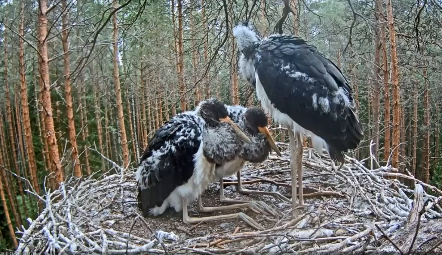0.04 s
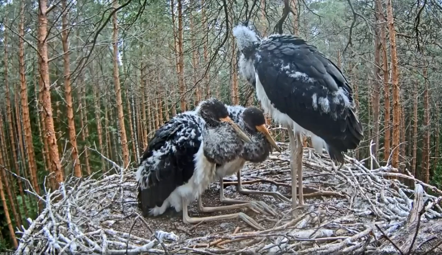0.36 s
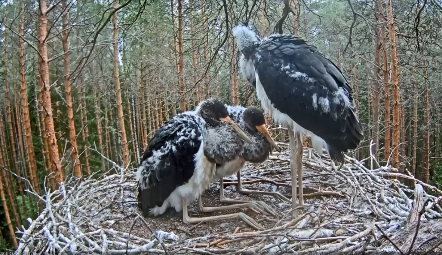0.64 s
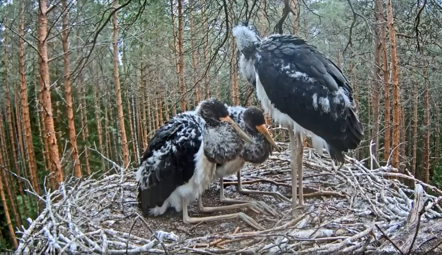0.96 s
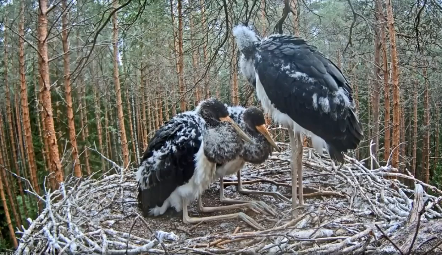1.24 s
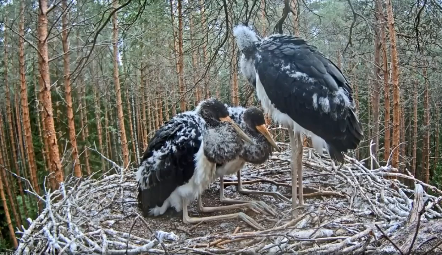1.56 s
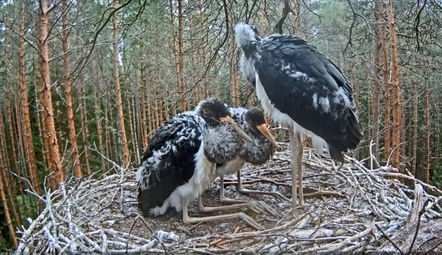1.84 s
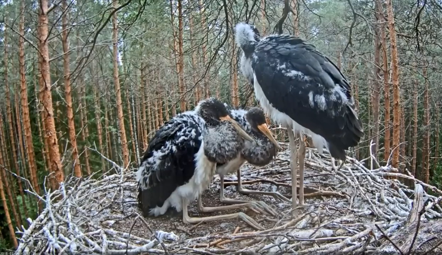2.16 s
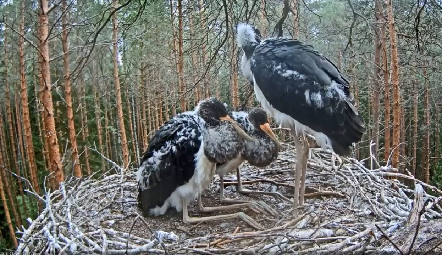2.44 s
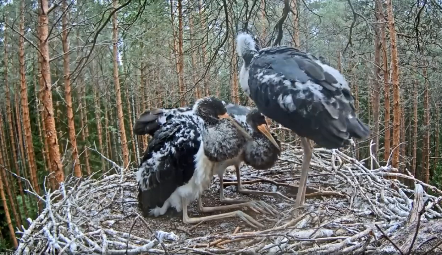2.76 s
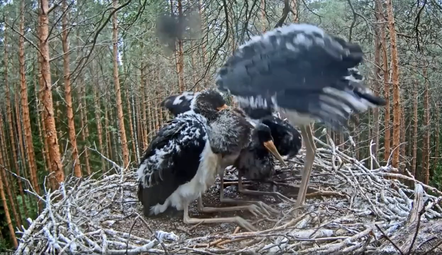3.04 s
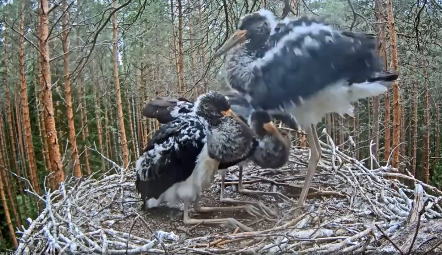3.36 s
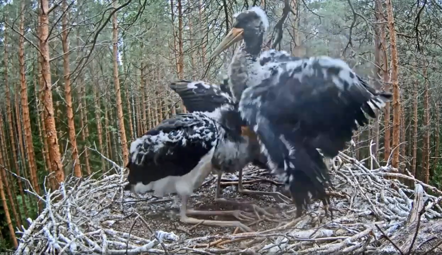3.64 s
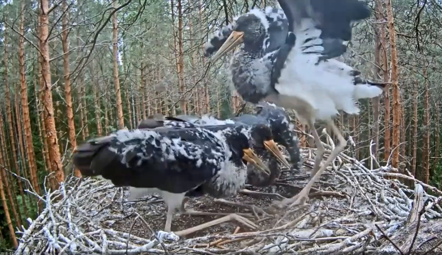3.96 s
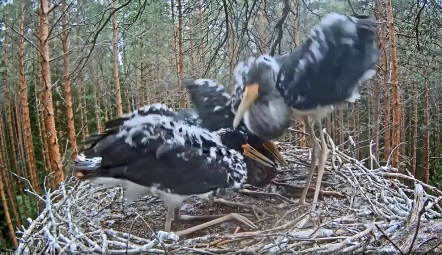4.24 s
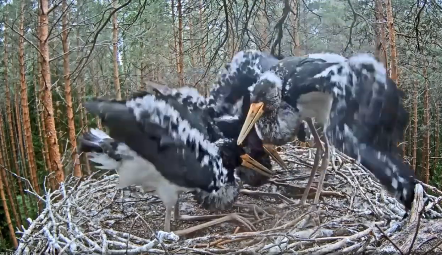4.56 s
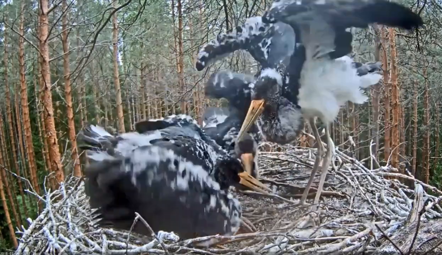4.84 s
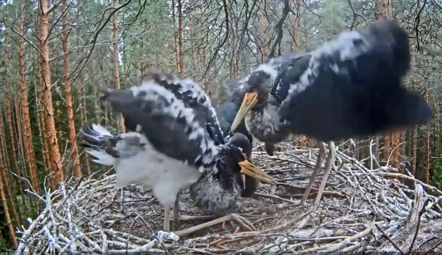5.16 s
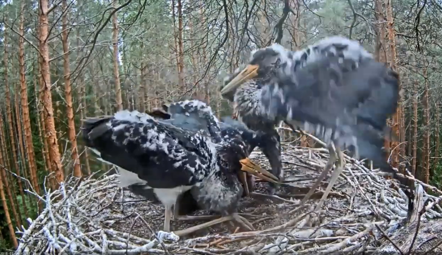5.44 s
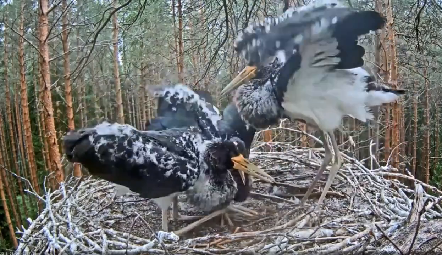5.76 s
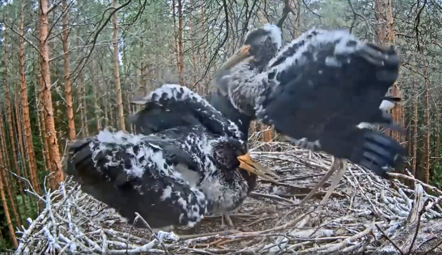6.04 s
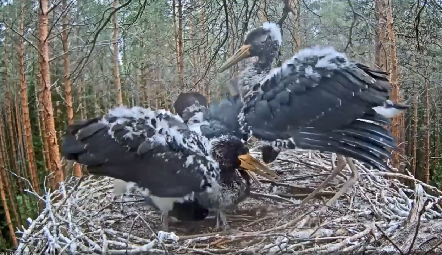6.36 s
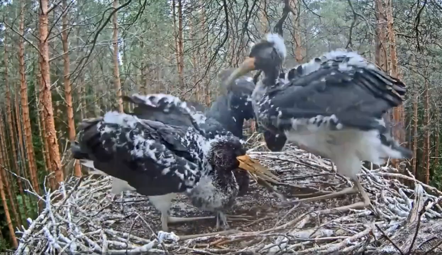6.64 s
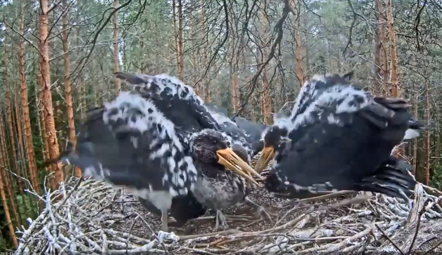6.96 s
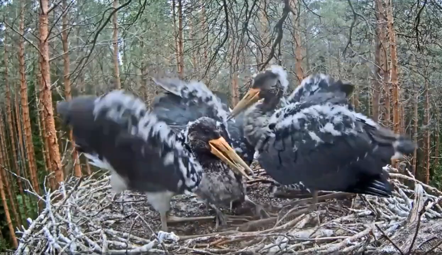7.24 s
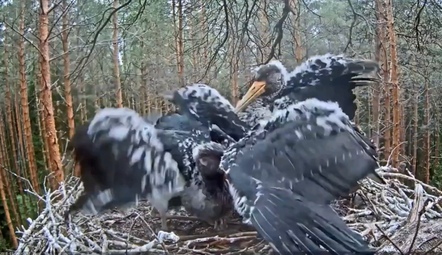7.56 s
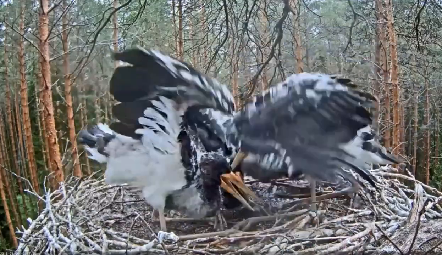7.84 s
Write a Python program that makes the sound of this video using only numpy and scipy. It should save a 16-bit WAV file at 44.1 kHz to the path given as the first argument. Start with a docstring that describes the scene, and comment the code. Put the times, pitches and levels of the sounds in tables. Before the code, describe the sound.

For the first two and a half seconds there is only a soft, steady forest hush, with a few faint, thin peeps from small birds near the start and around two seconds. Feathers then begin to brush. From about three seconds, stork chicks close to the microphone beg in a fast see-saw of short low croaks and harsh, swooping, whistled squeaks, roughly nine a second. Underneath, their wings rustle over crackling dry twigs, with scattered sharp knocks on the nest and five brief low puffs of air on the microphone between about 3.7 and 7.4 seconds. The begging gets louder near five seconds, when two chicks squeak at once. From about 5.6 seconds thin, wavering squeals arch between the calls. After a very short lull around 6.5 seconds, the calls return at full strength, and the feather rustle swells toward the end at eight seconds.

```python
"""Black stork nestlings beg on a stick nest in a pine forest, close to a small fixed microphone. Small birds
peep over the forest hush, then feathers start to brush. From about three seconds on the chicks call with low
croaks (pulses ringing the throat) and harsh, swooping, whistled squeaks, about nine a second; at first a croak
leads into each squeak, later it breaks out in the squeak's middle, while their wings fan the air and knock the
twigs. At the height of the begging two squeak at once, and thin squeals arch between the calls to the end."""
import sys
import numpy as np
from scipy import signal
from scipy.fft import rfft, irfft
from scipy.io import wavfile
from scipy.ndimage import map_coordinates

SR = 44100
rng = np.random.default_rng(int(sys.argv[2]) if len(sys.argv) > 2 else 0)


def store_wav(level_fs):
    """Save 16-bit WAV to argv[1]."""
    pcm = np.round(np.clip(np.atleast_2d(level_fs), -1, 1) * 32767)
    wavfile.write(sys.argv[1], SR, pcm.T.astype(np.int16))


N = 352800
TIME = np.arange(N) / SR


def undb(db):
    """Decibels to gain."""
    return 10 ** (np.asarray(db) / 20)


def unit(x):
    """Scale to rms 1."""
    return x / np.sqrt(np.mean(x ** 2))


def add(out, start_s, x):
    """Mix x in from a start time."""
    i = int(start_s * SR)
    out[i:i + len(x)] += x[:N - i]


def at(curve, time_s):
    """Read an automation curve's columns at a given time."""
    times, *columns = np.transpose(curve)
    return [np.interp(time_s, times, column) for column in columns]


def colour(x, eq):
    """Shape x with an EQ curve of (freq_hz, gain_db) points; rms 1."""
    hz, db = np.transpose(eq)
    bins = np.arange(len(x) // 2 + 1) * SR / len(x)
    gain = undb(np.interp(np.log(bins + 1), np.log(hz), db))
    return unit(irfft(rfft(x) * gain, len(x)))


def wander(hz):
    """Smooth random modulation up to a given rate; rms 1."""
    return unit(signal.sosfilt(signal.butter(2, hz, fs=SR, output="sos"), rng.standard_normal(N)))


def scatter(x, db, decay_s):
    """Add a dense cloud of echoes that dies away."""
    echoes = rng.standard_normal(SR) * np.exp(-TIME[:SR] / decay_s)
    return x + undb(db) * signal.fftconvolve(x, echoes / np.linalg.norm(echoes))[:N]


# EQ of the forest bed: freq_hz, gain_db
FOREST_EQ = [(15, -12), (25, 1), (91, -4), (250, -11), (620, -13.5), (1700, -22), (4200, -34.5),
             (7420, -39), (14000, -42)]


def forest(level_db=-48):
    """Steady hush of air in the pines."""
    return colour(rng.standard_normal(N), FOREST_EQ) * undb(level_db)


# small bird cues: start_s, length_s, pitch_hz, fall_octaves, level_db
BIRD_PEEPS = [(0.093, 0.026, 8900, 0.29, -52.5), (0.122, 0.013, 8600, 0.38, -57), (.17, .07, 7700, .1, -67),
              (.565, .075, 7600, 0.1, -66), (1.908, 0.015, 9200, 0.21, -57.5),
              (1.93, 0.016, 9000, 0.38, -60)]


def small_birds():
    """Thin falling peeps; the steep ones buzz."""
    out = np.zeros(N)
    for start, length, hz, fall, db in BIRD_PEEPS:
        age = np.linspace(0, 1, int(length * SR))
        buzz = fall / 5 * wander(700)[:len(age)]
        pitch = hz * 2 ** (buzz - fall * np.sin(np.pi * age / 2))
        phase = 2 * np.pi * np.cumsum(pitch) / SR
        add(out, start, undb(db) * np.sin(np.pi * age) * np.sin(phase))
    return out


# wing strokes that blow on the microphone: peak_s, level_db
WING_GUSTS = [(3.682, -39), (4.08, -36), (4.98, -33), (6.04, -38), (7.359, -32.5)]


def gusts(width_s=0.017):
    """Air pushed by a wing rumbles on the microphone."""
    swells = sum(undb(db) * np.exp(-((TIME - peak) / width_s) ** 2) for peak, db in WING_GUSTS)
    return wander(72) * swells


# fader ride of the brushing feathers: time_s, level_db
FEATHER_LEVEL = [(2.5, -66), (2.75, -59.5), (3.7, -45.5), (5.7, -49.5), (6.6, -57), (7.85, -36.5),
                 (8, -45.5)]
# wings and feet striking twigs: start_s, level_db, decay_s
TWIG_KNOCKS = [(3.036, -39.5, 0.038), (3.162, -41.5, 0.0057), (3.751, -27.5, 0.0074), (4.713, -28, 0.017),
               (5.586, -25, 0.01), (7.129, -26, 0.0031)]
# EQ of feathers, twigs and hissing breath: freq_hz, gain_db
HISS_EQ = [(2000, 14.5), (5000, 10.5), (9000, 9), (13000, -11.5)]


def wings(grain_db=1.0, crackle_db=-4, snaps_per_s=90):
    """Feathers scrape in fine grains over crackling dry twigs; each knock is a burst that dies away."""
    force = undb(np.interp(TIME, *np.transpose(FEATHER_LEVEL), left=-np.inf) + 2 * wander(30))
    snaps = (rng.random(N) < snaps_per_s / SR) * rng.uniform(-1, 1, N)
    crackle = undb(crackle_db) * force * colour(scatter(snaps, db=6, decay_s=.0012), HISS_EQ)
    for start, db, decay in TWIG_KNOCKS:
        add(force, start, undb(db) * np.exp(-TIME[:SR] / decay))
    grains = rng.standard_normal(N) * undb(grain_db * wander(1300))
    return crackle + force * colour(grains, HISS_EQ)


# throat resonances: centre_hz, width_hz, gain_db
FORMANTS = [(240, 89, 9), (626, 286, 3), (1204, 65, 2.5), (1890, 114, 7), (2487, 146, 3), (3430, 130, 1.5)]


def throat(x, low_db, upper_db, shift=1):
    """The chick's throat: two low resonances and the brighter ones of the open bill."""
    out = np.zeros(len(x))
    for k, (hz, width, db) in enumerate(FORMANTS):
        centre = hz * shift
        ring = signal.lfilter(*signal.iirpeak(centre, centre / width, fs=SR), x)
        out += (-1) ** k * undb(db + (low_db if k < 2 else upper_db)) * ring
    return out


# how both calls change with excitement: time_s, croak_pitch_hz, croak_fall_log_ratio,
# croak_bright_db, croak_honk_db, squeak_swoop_octaves, squeak_swoop_db
VOICE_CURVES = [(3.278, 206.3, 0.11, -6, -13, 0.46, -18.5), (3.72, 288.9, .18, -3.5, 7, 0.63, -11.5),
                (4.4, 303.6, 0.39, -0.5, -6, 0.39, -21.5), (5.8, 356.6, 0.47, 2.5, -33, .5, -24),
                (6.4, 343.5, 0.52, 2, -29, 0.29, -21), (6.75, 346, 0.46, 3.5, -14, 0.065, -28.5),
                (7.9, 359.5, 0.46, -1, -25, 0.27, -23.5)]
# how hard the chicks croak: time_s, level_db
CROAK_EFFORT = [(3.2, -39), (3.28, -31.5), (3.8, -28.5), (4.65, -30.5), (5.2, -29), (7.9, -31.5)]
# croaks, at first just ahead of each squeak, from about 5.4 s breaking out in its middle: start_s, length_s
CROAK_CUES = [ (3.2, 0.0054), (3.279, .046), (3.374, 0.055), (3.487, 0.039), (3.598, 0.05), (3.721, .031),
              (3.836, 0.033), (3.943, 0.038), (4.052, 0.045), (4.173, 0.034), (4.27, 0.043), (4.447, 0.016),
              (4.556, 0.032), (4.654, 0.062), (4.715, 0.039), (4.789, 0.035), (4.926, 0.037),
              (5.034, 0.037), (5.133, 0.041), (5.24, .03), (5.344, 0.029), (5.407, 0.029), (5.447, 0.027),
              (5.511, 0.032), (5.554, 0.027), (5.645, .022), (5.755, 0.022), (5.831, 0.028), (5.936, .018),
              (6.031, 0.028), (6.099, 0.022), (6.143, 0.023), (6.202, .022), (6.242, 0.027), (6.306, 0.027),
              (6.353, .056), (6.433, 0.026), (6.495, 0.047), (6.64, 0.0079), (6.741, 0.013), (6.828, 0.024),
              (6.891, 0.009), (6.937, 0.023), (7.044, 0.047), (7.052, 0.035), (7.173, 0.02), (7.262, 0.013),
              (7.342, 0.014), (7.377, 0.015), (7.574, 0.014), (7.705, 0.026), (7.789, 0.039),
              (7.906, 0.041)]


def croaks(breath=0.14, fundamental_db=-6, throat_spread=.055, release_s=.006):
    """Falling trains of uneven, breathy pulses ring the throat over a round tone and its honking octave."""
    out, jitter = np.zeros(N), .12 * wander(250)
    hiss, strength = rng.standard_normal(N), undb(3 * wander(250))
    variations = rng.standard_normal((len(CROAK_CUES), 3))
    for (start, length), (detune, sag, gape) in zip(CROAK_CUES, variations):
        start_hz, fall, bright_db, honk_db = at(VOICE_CURVES, start)[:4]
        now = np.flatnonzero((TIME >= start) & (TIME < start + length + release_s))
        age = (TIME[now] - start) / length
        progress = age / age[-1]
        settled = np.sin(np.pi * progress / 2)  # ragged at first, steadier at the end
        glide = -fall * (1 + .3 * sag) * age
        pitch = start_hz * np.exp(glide + (1.2 - settled) * jitter[now] + .03 * detune)
        cycles = np.cumsum(pitch) / SR
        pulses = np.diff(np.floor(cycles), prepend=-1) * strength[now]
        puffs = breath * hiss[now] * np.exp(-2 * (cycles % 1))
        tone = undb(fundamental_db) * np.cos(2 * np.pi * cycles)
        honk = undb(honk_db) * np.cos(4 * np.pi * cycles)
        rattle = unit(throat(pulses + puffs, 0, bright_db, shift=1 + throat_spread * gape))
        voice = rattle + settled * (tone - honk)
        envelope = np.sin(np.pi * np.sqrt(progress)).clip(0) ** .5  # quick attack, softer release
        out[now] += undb(at(CROAK_EFFORT, start)[0]) * unit(voice * envelope)
    return out


# squeals that arch from one squeak to the next: start_s, length_s, top_pitch_hz, level_db
SQUEAL_CUES = [(5.605, .056, 4250, -32), (5.769, 0.041, 5220, -34), (5.838, 0.065, 4240, -34),
               (5.938, 0.06, 4350, -32.5), (6.655, 0.06, 3930, -36.5), (6.75, 0.055, 5100, -36.5),
               (6.853, 0.066, 5850, -32.5), (6.983, 0.042, 4620, -32.5), (7.137, 0.039, 4920, -31.5),
               (7.218, 0.033, 4930, -31.5), (7.385, 0.07, 6030, -33.5), (7.489, 0.082, 5700, -36.5),
               (7.61, 0.068, 6420, -32), (7.714, 0.056, 5920, -30), (7.928, 0.043, 4400, -34)]


def squeals(foot_hz=2300, bill_hz=4200, thin_db_per_octave=-26, twin_ratio=1.1, twin_db=-6,
            overtone_db=-18):
    """A wavering whistle and its weaker, higher twin climb from a hoarse foot to a thin top and back."""
    out = np.zeros(N)
    for ratio, voice_db in (1, 0), (twin_ratio, twin_db):
        shake, waver, tremble = .06 * wander(1040), .045 * wander(120), undb(5.2 * wander(300))
        for start, length, top_hz, db in SQUEAL_CUES:
            now = np.flatnonzero((TIME > start) & (TIME < start + length))
            arch = 1 - abs(2 * (TIME[now] - start) / length - 1) ** 1.5
            hoarse = np.interp(start, (7, 7.5), (1, 2))  # the last squeals are hoarser
            wobble = np.exp(waver[now] + hoarse * (1 - arch / 2) * shake[now])
            pitch = ratio * (foot_hz + (top_hz - foot_hz) * arch) * wobble
            thin_db = thin_db_per_octave * np.log2(pitch / bill_hz).clip(0)
            blow = undb(db + voice_db + thin_db) * np.sqrt(2 * np.sqrt(arch)) * tremble[now]
            phase = 2 * np.pi * np.cumsum(pitch) / SR
            out[now] += blow * (np.sin(phase) + undb(overtone_db) * np.sin(2 * phase))
    return out


# begging squeaks: middle_s, level_db
SQUEAK_CUES = [ (3.314, -38), (3.423, -26.5), (3.538, -26.5), (3.66, -31), (3.774, -30.5), (3.894, -27),
               (4.006, -24.5), (4.132, -25.5), (4.239, -24), (4.339, -24.5), (4.444, -26), (4.521, -30),
               (4.565, -28.5), (4.681, -30), (4.827, -20.5), (4.901, -21), (4.99, -20.5), (5.089, -24),
               (5.196, -22), (5.301, -23.5), (5.405, -25), (5.505, -26.5), (5.551, -24), (5.655, -26.5),
               (5.758, -27), (5.821, -27), (5.924, -20), (6.016, -21), (6.081, -21.5), (6.132, -28),
               (6.183, -25), (6.239, -29), (6.28, -24.5), (6.345, -23), (6.393, -25.5), (6.433, -25.5),
               (6.495, -32.5), (6.727, -19.5), (6.826, -20), (6.935, -19.5), (6.982, -18.5), (7.04, -22.5),
               (7.072, -18.5), (7.171, -21.5), (7.279, -20), (7.374, -19.5), (7.476, -21), (7.581, -23),
               (7.687, -22), (7.784, -21), (7.9, -28)]
# squeak envelope as the begging goes on: time_s, lead_in_s, tail_share_of_wait
SQUEAK_SHAPE = [(3.3, 0.012, 0.32), (3.78, 0.024, 0.38), (4.12, 0.019, 0.57), (4.45, 0.02, 0.62),
                (4.9, 0.016, 0.36), (5.3, 0.026, 0.51), (6.4, .02, 0.59), (6.75, 0.027, 0.4),
                (7.9, 0.027, 0.43)]


def phrasing(sibling_from_s=5.03, sibling_every_s=0.12, sibling_db=-25.5, longest_wait_s=.11):
    """Middle, lead-in, tail and level of each squeak; a second chick adds four half-length ones."""
    sibling = [(sibling_from_s + k * sibling_every_s, sibling_db) for k in range(4)]
    rows = []
    for calls, size in (SQUEAK_CUES, 1), (sibling, .5):
        middles, db = np.transpose(calls)
        wait = np.minimum(np.diff(middles, append=np.inf), longest_wait_s)  # hurried calls are shorter
        lead, share = at(SQUEAK_SHAPE, middles)[:2]
        rows += zip(middles, size * lead, size * share * wait, db)
    return rows


# the squeaks sharpen with each surge of begging and sag between surges: time_s, pitch_hz
SQUEAK_PITCH = [(3.5, 3437), (3.88, 3717), (4.45, 3336), (4.85, 3126), (5, 3340), (5.5, 3108), (5.7, 3897),
                (5.85, 3480), (6.5, 3146), (6.8, 3280), (7.03, 3206), (7.65, 3850), (7.9, 3490)]


def squeaks(core_s=0.00833, full_swoop_s=0.039, scoop=0.71, flutter=0.1346, crack=0.78,
            pitch_spread=.018, swoop_spread=.1, throat_spread=.055, lock_db=-20,
            thin_db_per_octave=-4, rasp_db=-6, overtone_db=-27, hiss_db=-13.5):
    """A hoarse whistle dips to a loud middle, cracks into a rasp and swoops up again."""
    whistle, breakup, air = np.zeros((3, N))
    shake, slip, tremble = wander(1390), wander(145), wander(197)
    calls = phrasing()
    for (middle, lead, tail, db), (detune, reach) in zip(calls, rng.standard_normal((len(calls), 2))):
        hz = at(SQUEAK_PITCH, middle)[0] * (1 + pitch_spread * detune)
        swoop, swoop_db = at(VOICE_CURVES, middle)[4:]
        now = np.flatnonzero((TIME > middle - lead) & (TIME < middle + tail))
        t = TIME[now] - middle
        place = t / np.where(t < 0, lead, tail)  # -1 at the start, 1 at the end
        core = np.exp(-(t / core_s) ** 4)
        # the pitch scoops into the middle and swoops out of it, less far in a hurried call
        arch = np.sin(np.pi / 2 * abs(place) ** 1.3) * np.where(t < 0, scoop, 1)
        rise_octaves = swoop * (1 + swoop_spread * reach) * arch * min(tail / full_swoop_s, 1)
        # a hard-blown middle locks to a purer tone, and the high swoops are smoother
        lock = .8 * core * min(undb(db - lock_db), 1)
        rough = (1 - lock) / (1 + (rise_octaves / .42) ** 2)
        dive = crack * np.tanh(np.maximum(slip[now], 0) ** 2 / 2)
        pitch = hz * 2 ** rise_octaves * np.exp(rough * (flutter * shake[now] - dive))
        # effort swells the middle slightly more than the swoops, which thin out as they rise
        fade = np.sqrt(1 - place ** np.where(t < 0, 20, 2))
        shoulder = undb(swoop_db + 0.96 * (db + 16)) * fade
        envelope = core * undb(db) + (1 - core) * shoulder * undb(thin_db_per_octave * rise_octaves)
        blow = envelope * undb(4 * (1 - core / 2) * tremble[now])
        phase = 2 * np.pi * np.cumsum(pitch) / SR
        whistle[now] += np.sqrt(2) * blow * (np.sin(phase) + undb(overtone_db) * np.sin(2 * phase))
        breakup[now] += blow * rough
        air[now] += shoulder
    # the membranes slap irregularly and ring the throat; air hisses out of the bill
    slaps = rng.standard_normal(N) * undb(3.5 * wander(470))
    ringing = throat(slaps, low_db=5, upper_db=16.5)
    flexing = np.cumsum(1 + throat_spread * wander(15))  # the throat flexes, so its resonances drift
    rasp = breakup * unit(map_coordinates(ringing, [flexing], mode="mirror"))
    hiss = air * colour(rng.standard_normal(N), HISS_EQ)
    return whistle + undb(rasp_db) * rasp + undb(hiss_db) * hiss


def scene():
    """The sticks of the nest scatter the chicks' calls, the trunks those of the small birds."""
    chicks = scatter(squeaks() + squeals() + croaks(), db=-13, decay_s=.005)
    far_birds = scatter(small_birds(), db=-1.5, decay_s=0.066)
    return (chicks + wings() + gusts() + far_birds + forest())[None]


def record(dry, boost_db=5, knee_db=-35, settle_s=0.14, top_hz=14100):
    """Gain control lifts the quiet forest and backs off under the calls; the microphone cuts the top."""
    step = 1 / (settle_s * SR)
    power = signal.lfilter([step], [1, step - 1], dry ** 2)
    gain = undb(boost_db / (1 + power / undb(knee_db) ** 2))
    high_cut = signal.ellip(10, .2, 70, top_hz, fs=SR, output="sos")
    return signal.sosfilt(high_cut, dry * gain)


dry = scene()
out = record(dry)
store_wav(out)
```